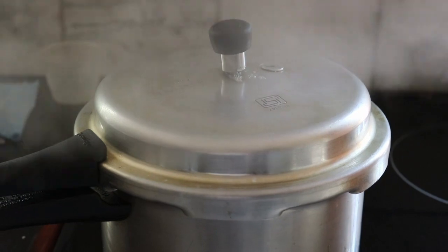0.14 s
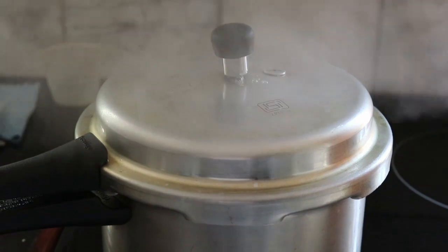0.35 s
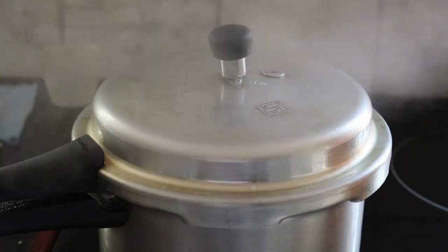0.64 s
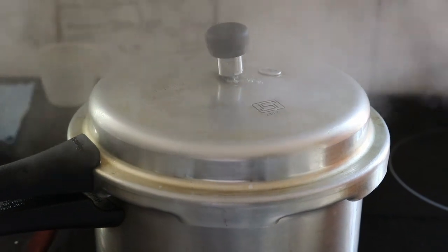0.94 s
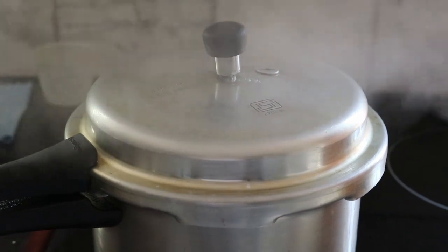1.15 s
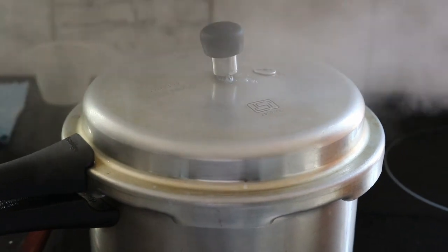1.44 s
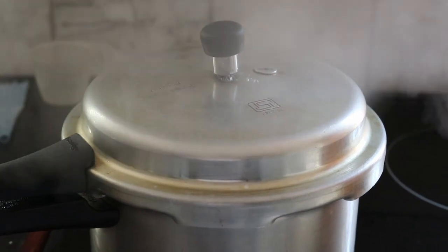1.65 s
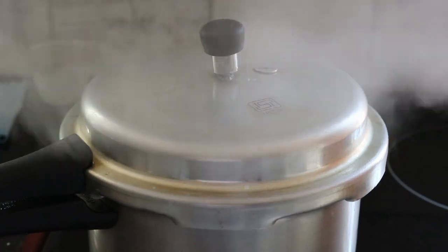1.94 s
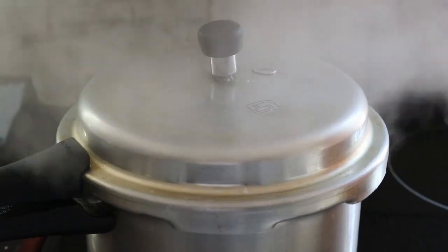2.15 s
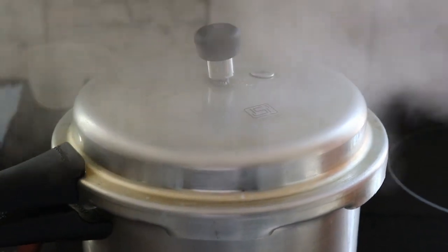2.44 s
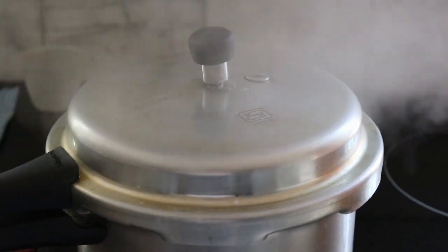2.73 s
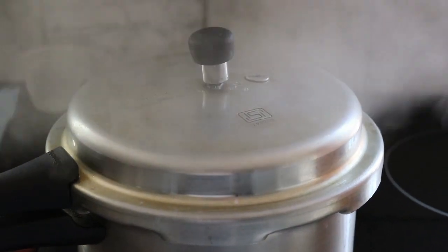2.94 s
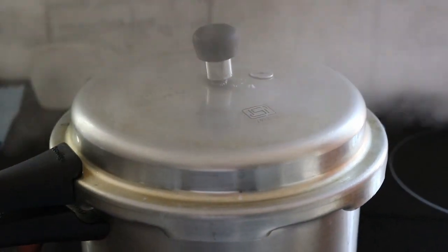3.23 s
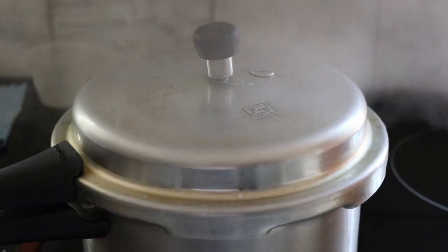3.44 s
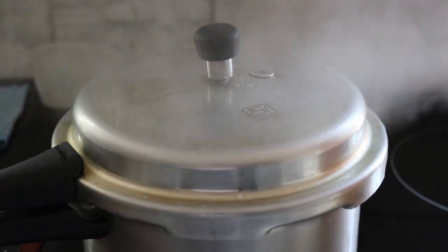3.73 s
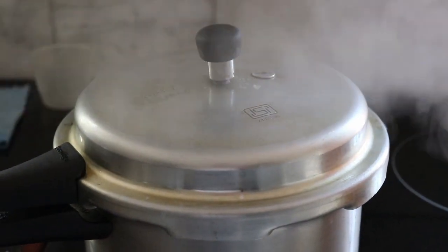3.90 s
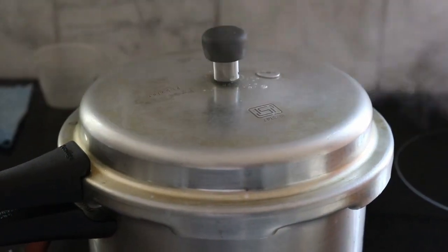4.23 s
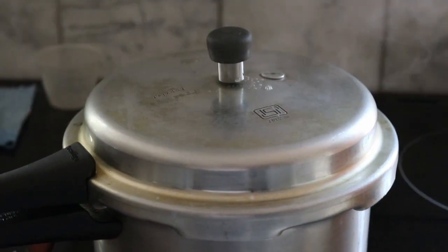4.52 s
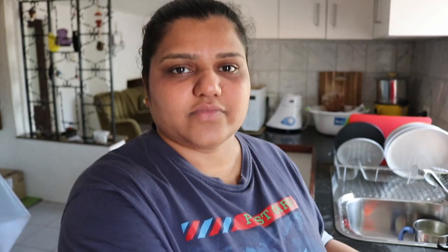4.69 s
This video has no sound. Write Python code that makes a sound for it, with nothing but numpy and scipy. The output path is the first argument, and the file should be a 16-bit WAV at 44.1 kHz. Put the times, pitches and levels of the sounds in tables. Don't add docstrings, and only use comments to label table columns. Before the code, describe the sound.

Steam rushes continuously from a pressure cooker's weight, wide and hissy, wavering only slightly. The jet sputters and closes just after four seconds, its tail dying quickly off the tiles while the pot bubbles and rings softly. Near-quiet follows, then a hard scene change to soft indoor room tone. Two dull bumps sound on the handheld camera's body, followed at once by a crisp hard click with short room reverberation.

```python
import sys
import numpy as np
from scipy import signal
from scipy.fft import rfft, irfft, next_fast_len
from scipy.io import wavfile
from scipy.ndimage import uniform_filter1d

SR = 44100
rng = np.random.default_rng(int(sys.argv[2]) if len(sys.argv) > 2 else 0)


def voltage_ratio(decibels):
    exponent = np.asarray(decibels, float) / 20
    return 10 ** exponent


def persist_wave(psi):
    counts = np.round(np.clip(psi, -1, 1) * 32767).astype(np.int16)
    wavfile.write(sys.argv[1], SR, np.atleast_2d(counts).T)


N = 214193
SIZE = next_fast_len(N + SR)
HZ = np.fft.rfftfreq(SIZE, 1 / SR)

# pitch_hz, density_db (dB per Hz)
STOVE_HUM = [(21, -39), (35, -13), (54, -3), (87, -13.5), (166, -12.5), (271, -9.5), (306, -9.5),
             (466, -15), (516, -16), (2000, -27), (2600, -58), (4400, -120)]
# pitch_hz, likeness (-1 to 1)
STOVE_LIKENESS = [(60, 0.86), (180, 0.59), (550, 0.49), (1650, 0.25), (4970, 0.11), (15000, 0.08)]
# pitch_hz, density_db (dB per Hz)
SEEP = [(1200, -57), (2000, -11), (3600, -4), (4200, -14), (5100, -12), (5800, 0), (6900, 1), (8300, -3),
        (10200, 0), (11800, -1), (13000, -9), (15800, -5)]
# pitch_hz, density_db (dB per Hz)
ROOM_TONE = [(24, -36), (40, -10), (81, -7.5), (146, -19), (422, -14), (749, -23), (882, -23), (1150, -21),
             (2000, -28), (2600, -75), (4400, -120)]
# pitch_hz, density_db (dB per Hz)
ROOM_AIR = [(1200, -60), (2000, -4), (3000, 2), (3900, 1), (4300, -11), (5500, -6), (6500, -3),
            (9300, -6.5), (11500, -12), (15800, -24)]
# pitch_hz, likeness (-1 to 1)
ROOM_LIKENESS = [(60, 1), (180, 0.88), (550, 0.67), (1650, -0.28), (4970, -0.097), (15000, 0.08)]

# pitch_hz, t60_s, tail_db (relative to the direct sound)
KITCHEN = [(300, 0.72, -7.5), (1000, 0.44, -2), (2540, 0.61, -3), (4330, 0.51, -7), (7040, 0.49, -3),
           (8950, 0.31, -1), (10940, 0.3, 1.5), (13000, 0.3, 0), (15500, 0.26, 1)]
# pitch_hz, likeness (-1 to 1)
TAIL_LIKENESS = [(100, 0.97), (700, 0.18), (2000, 0.033), (4000, 0.024), (16000, 0.071)]
# pitch_hz, left_minus_right_db
SHADE = [(100, -2), (1000, -2), (2200, -4.5), (3500, 0), (4500, -10), (5500, -5.5), (7000, -4),
         (10500, -6.5), (12000, -3.5), (15500, -1.5)]
# pitch_hz, left_lead_rad
LEFT_LEAD = [(100, 0), (2900, -.3), (3900, -1.4), (4800, -.6), (7100, -1.3), (8900, -1.9), (10600, -1.6),
             (11800, -.6), (15000, -2.2)]

# pitch_hz, t60_s, left_db, right_db
TAP_MODES = [(1200, 0.017, -30, -23)]
TICK_MODES = [(2000, 0.0065, -24, -36), (3500, 0.0063, -32, -38), (12200, .012, -44, -46)]
BUMP_MODES = [(390, .014, -16, -34), (1500, 0.009, -27, -26), (2300, 0.0089, -33, -25),
              (3300, .006, -38, -40)]
SLAP_MODES = [(640, .005, -30, -7)]
THUD_MODES = [(264, .04, -27, -36), (1500, 0.005, -42, -34), (105, 0.09, -26, -42), (167, 0.14, -36, -34),
              (77, 0.25, -35, -44)]
BLOWS = [
    4.7602,
    4.7612,
    4.7684,
    4.7700,
    4.7736,
]
LATE_TURNS = 0.2

# pitch_hz, width_hz, level_db
CLICK_MODES = [(1840, 620, -8), (2830, 330, -11.5), (3470, 700, -7.5), (4470, 600, -8), (5300, 570, -0.5),
               (6400, 350, 1), (7400, 660, -1), (8500, 690, -1), (11100, 1100, -8), (12800, 1500, -10)]
CLICK_S, PRE_TICK_S, PRE_TICK_DB = 4.8283, 0.0026, -30
SLIP_COUNT, SLIP_GAP_S, SLOWING, JITTER = 14, 0.0004, 1.11, 0.3
SWELL_S, SWELL_DB, HOLD_S, FADE_DB_PER_S, UNEVEN_DB = 0.001, -14, 0.003, 3200, 3

# pitch_hz, width_hz, level_db, start_s, end_s
POT_MODES = [
    (290, 110, -65.5, 4.14, 4.24),
    (650, 30, -67, 4.01, 4.09),
    (686, 33, -68.5, 4.16, 4.28),
    (844, 29, -55, 4.135, 4.215),
    (1106, 63, -57.5, 4.04, 4.19),
    (1250, 40, -67, 4.12, 4.22),
    (1350, 26, -60, 4.16, 4.25),
    (1365, 17, -82, 4.27, 4.39),
    (1715, 61, -60, 4.08, 4.21),
    (276, 31, -72, 4.4, 4.47),
]
# pitch_hz, density_db (dB per Hz)
SLOSH = [(150, -27), (300, -6.5), (700, 0), (1200, 3.5), (1900, -1), (3000, -23)]
SIMMER_DB, SIMMER_GROWTH_DB_PER_S, SIMMER_END_S, SETTLED_DB = -60, 0.6, 3.97, -74.5
SLOSH_S, SLOSH_DB, SLOSH_RISE_DB_PER_S, SLOSH_FALL_DB_PER_S = 4.13, -52, 250, 151

# pitch_hz, density_db (dB per Hz)
HISS = [(2000, -41), (3500, -7.5), (4200, -15), (5000, -7.5), (6200, -3), (6900, 1.5), (7500, -3),
        (8000, -6), (9000, -5.5), (10100, -1.5), (11700, -4.5), (12400, -9), (13600, -14), (15800, -19)]
# pitch_hz, density_db (dB per Hz)
ROAR = [(180, -66), (300, -49.5), (861, -18.5), (975, -20), (1340, -11), (1740, -10), (1860, -6.5),
        (2520, 0), (4500, -2), (5850, -12), (9900, -120)]
# centre_s, width_s, level_db
SURGES = [(0.38, 0.12, -0.2), (0.72, 0.1, .5), (1.40, 0.1, 1.5), (2.6, 0.074, -0.3), (3.1, 0.34, 0.9),
          (3.68, 0.03, -1.2), (3.765, .025, 2), (3.85, 0.066, -2.5), (3.94, 0.028, 3.5), (4.055, .02, 3),
          (0, 0.028, 3), (1.07, .08, 0.6), (1.8, .12, 0.1), (2.85, .1, 0)]
# centre_s, width_s, level_db
SPIT = (4.097, .007, 4)
# start_s, fall_db_per_s
SEATING = (4.108, 900)
FLOW_DB, ROAR_DB = -24, -10.5
ROAR_GROWTH_DB_PER_S = 0.08
ROAR_LAG = 0.79
CHOKE_S, CHOKE_DB_PER_S, ROAR_CHOKE_S, ROAR_CHOKE_DB = 3.968, 47.5, 3.84, -2
WHISTLE_HZ, WHISTLE_WIDTH_HZ, WHISTLE_DB = 11500, 600, 9

CHANGE_S, FADE_OUT_S, GAP_S, FADE_IN_S = 4.6192, 0.008, 0.004, 0.028
EDGE_HZ = 15770


def evened(x):
    return x / np.sqrt(np.mean(x ** 2) + 1e-20)


def read(points, hz):
    f, value = np.transpose(points)
    return np.interp(np.log(hz + 1), np.log(f + 1), value)


def shaped(x, gain):
    return irfft(rfft(x, SIZE) * gain, SIZE)[..., :N]


def resonate(x, hz, width):
    r = np.exp(-np.pi * width / SR)
    pole = r * np.exp(2j * np.pi * hz / SR)
    return 2 * signal.lfilter([1 - r], [1, -pole], x).real


def pair(spectrum, same):
    a, b = rfft(rng.standard_normal((2, N)), SIZE)
    likeness = np.clip(read(same, HZ), -1, 1)
    right = likeness * a + np.sqrt(1 - likeness ** 2) * b
    return irfft(np.array([a, right]) * spectrum, SIZE)[:, :N]


def turbulence(spectrum, patchy_db, flicker_db):
    frames, hop = N // 64 + 8, 64
    a, b, patches = rng.standard_normal((frames, 129, 3)).T
    patches = uniform_filter1d(patches, size=8, axis=0)
    patches = evened(uniform_filter1d(patches, size=30, axis=1))
    t = np.arange(frames) * hop / SR
    rates_hz = np.geomspace(5, 90, num=40)
    flicker = evened(sum(np.sin(2 * np.pi * (f * t + rng.random())) / f ** 0.68 for f in rates_hz))
    grains = (a + 1j * b) * voltage_ratio(patchy_db * patches + flicker_db * flicker)
    x = signal.istft(grains, nperseg=256, noverlap=192)[1]
    return evened(shaped(x[:N], voltage_ratio(read(spectrum, HZ))))


def steady(spectrum, db, same):
    return voltage_ratio(db) * evened(pair(voltage_ratio(read(spectrum, HZ)), same))


def kitchen(x, wet_db, gap, drift_s):
    source = rfft(x, SIZE)
    spectrum = source * np.array([np.exp(1j * read(LEFT_LEAD, HZ)), np.ones(len(HZ))])
    decay = [row[:2] for row in KITCHEN]
    wet = voltage_ratio(wet_db + read([row[::2] for row in KITCHEN], HZ))
    for k in range(3):
        hz, t, z = signal.stft(pair(1, TAIL_LIKENESS)[:, :SR // 2], SR, nperseg=256)
        t60 = read(decay, hz)[:, None]
        tail = signal.istft(z * voltage_ratio(-60 * t / t60) / np.sqrt(t60), SR, nperseg=256)[1]
        tail *= np.clip((np.arange(tail.shape[1]) / SR - gap) / 0.0028, 0, 1)
        share = np.sqrt(2 / 3) * np.cos(np.pi * (np.arange(N) / SR / drift_s + k / 3))
        spectrum += wet * rfft(tail / np.linalg.norm(tail[0]), SIZE) * rfft(x * share, SIZE)
    return irfft(spectrum, SIZE)[:, :N]


def knocks():
    first = round(BLOWS[0] * SR)
    t = np.arange(first, N) / SR
    out = np.zeros((2, N - first))
    for start, modes in zip(BLOWS, (TAP_MODES, TICK_MODES, BUMP_MODES, SLAP_MODES, THUD_MODES)):
        for hz, t60, left_db, right_db in modes:
            late = np.array([[0], [LATE_TURNS / hz]])
            u = np.maximum(t - start - late, 0)
            ring = np.sin(2 * np.pi * hz * u) * np.minimum(u * hz * 2.1, 1)
            out += voltage_ratio(np.array([[left_db], [right_db]]) - 60 * u / t60) * ring
    return np.pad(out, ((0, 0), (first, 0)))


def click():
    jitter, uneven, sign = rng.uniform(-1, 1, (SLIP_COUNT, 3)).T
    gaps = SLIP_GAP_S * SLOWING ** np.arange(SLIP_COUNT) * (1 + JITTER * jitter)
    u = np.cumsum(gaps) - SLIP_GAP_S
    db = SWELL_DB * np.maximum(1 - u / SWELL_S, 0)
    db = db - FADE_DB_PER_S * np.maximum(u - SWELL_S - HOLD_S, 0) + UNEVEN_DB * uneven
    drive = np.zeros(N)
    drive[np.round((CLICK_S + u) * SR).astype(int)] = voltage_ratio(db) * np.sign(sign)
    drive[round((CLICK_S - PRE_TICK_S) * SR)] = voltage_ratio(PRE_TICK_DB)
    ring = np.zeros(N)
    for k, (hz, width, level_db) in enumerate(CLICK_MODES):
        ring += (-1) ** k * voltage_ratio(level_db) * resonate(drive, hz, width) * SR / width
    return voltage_ratio(-10.0) * ring / abs(ring).max()


def pot():
    t = np.arange(N) / SR
    boiling = voltage_ratio(SIMMER_DB + SIMMER_GROWTH_DB_PER_S * (t - 1))
    simmer = voltage_ratio(SETTLED_DB) + boiling * np.clip((SIMMER_END_S - t) / 0.08 + 1, 0, 1)
    slosh_drop = np.maximum(SLOSH_RISE_DB_PER_S * (SLOSH_S - t), SLOSH_FALL_DB_PER_S * (t - SLOSH_S))
    slosh = voltage_ratio(SLOSH_DB - slosh_drop)
    out = (simmer + slosh) * turbulence(SLOSH, patchy_db=3, flicker_db=1.0)
    drives = rng.standard_normal((len(POT_MODES), N))
    for drive, (hz, width, db, start, end) in zip(drives, POT_MODES):
        burst = np.clip(np.minimum(t - start, end - t) / 0.017, 0, 1)
        ring = resonate(drive, hz, width) * burst
        out += voltage_ratio(db) * ring / np.sqrt((ring ** 2).sum() / burst.sum())
    return out


def steam():
    t = np.arange(N) / SR
    surge_db = sum(db * np.exp(-((t - s) / width) ** 2) for s, width, db in SURGES)
    spit_s, spit_width_s, spit_db = SPIT
    spit = np.exp(-((t - spit_s) / spit_width_s) ** 2)
    seat_s, seat_db_per_s = SEATING
    flow_db = FLOW_DB + surge_db + spit_db * spit
    flow_db -= CHOKE_DB_PER_S * np.maximum(t - CHOKE_S, 0)
    flow_db -= seat_db_per_s * np.maximum(t - seat_s, 0)
    roar_db = ROAR_DB + ROAR_GROWTH_DB_PER_S * (t - 2) - ROAR_LAG * surge_db
    roar_db += ROAR_CHOKE_DB * np.clip((t - ROAR_CHOKE_S) / 0.025, 0, 1)
    hiss = turbulence(HISS, patchy_db=0.5, flicker_db=0.5)
    whistle = spit * resonate(hiss, WHISTLE_HZ, WHISTLE_WIDTH_HZ)
    hiss = hiss + voltage_ratio(WHISTLE_DB) * whistle
    roar = turbulence(ROAR, patchy_db=0.5, flicker_db=0.58)
    return voltage_ratio(flow_db - 0.5) * (hiss + voltage_ratio(roar_db - 0.45) * roar)


def fades():
    t = np.arange(N) / SR - CHANGE_S
    fall = (-t - GAP_S / 2) / FADE_OUT_S
    rise = (t - GAP_S / 2) / FADE_IN_S
    return np.clip(np.maximum(fall, rise), 0, 1)


def scene():
    t = np.arange(N) / SR
    shade = voltage_ratio(read(SHADE, HZ) * np.array([[0.5], [-0.5]]))
    under = steady(STOVE_HUM, -72.1, STOVE_LIKENESS) + steady(SEEP, -63.5, STOVE_LIKENESS)
    cooker = kitchen(steam() + pot(), wet_db=-0.72, gap=0.0051, drift_s=1.607)
    stove = shaped(cooker + under, shade)
    tone = steady(ROOM_TONE, -47.6, ROOM_LIKENESS) + steady(ROOM_AIR, -54, ROOM_LIKENESS)
    snap = kitchen(click(), wet_db=-3.0, gap=0.0022, drift_s=2.5)
    snap = snap * voltage_ratio(np.array([[-1.5], [1.5]]))
    handheld = shaped(tone + snap, shade) + knocks()
    return fades() * np.where(t < CHANGE_S, stove, handheld)


def top_cut(x):
    return signal.sosfilt(signal.butter(12, 16570, fs=SR, output="sos"), x)


def record(dry):
    low_pass = np.clip((EDGE_HZ - HZ) / 20, 0, 1)
    mix = shaped(dry, low_pass)
    return top_cut(mix)


dry = scene()
out = record(dry)
persist_wave(out)
```